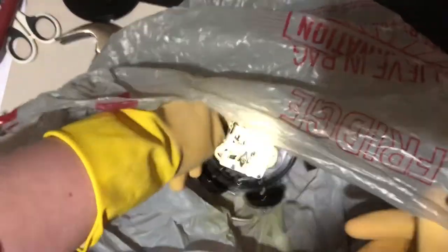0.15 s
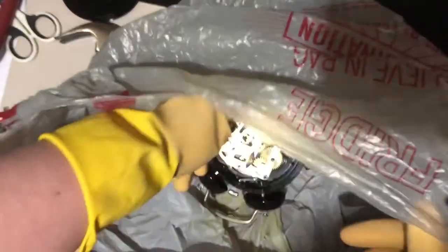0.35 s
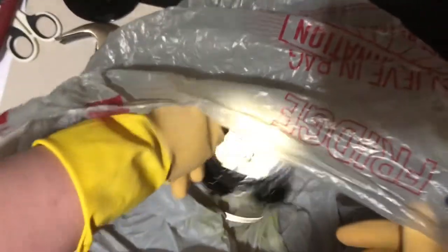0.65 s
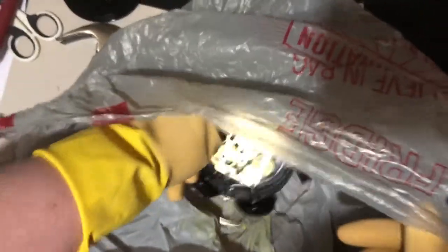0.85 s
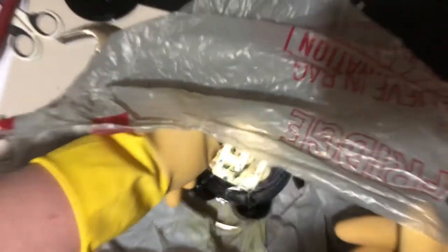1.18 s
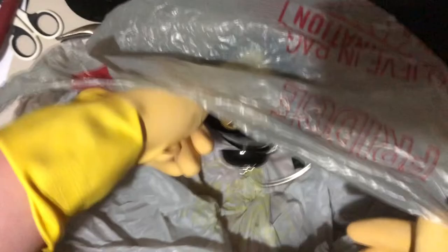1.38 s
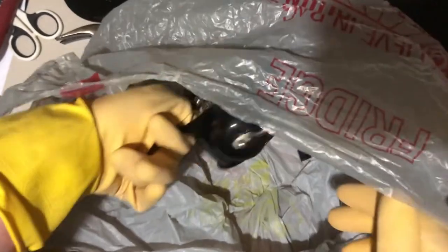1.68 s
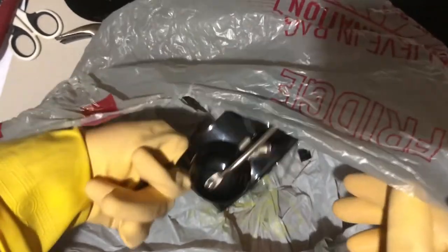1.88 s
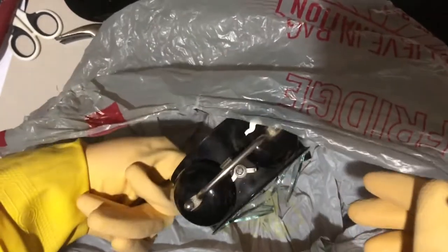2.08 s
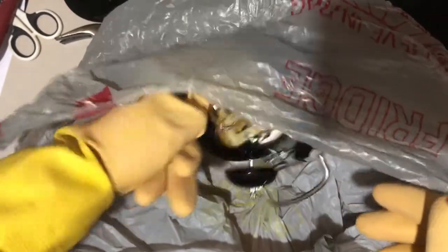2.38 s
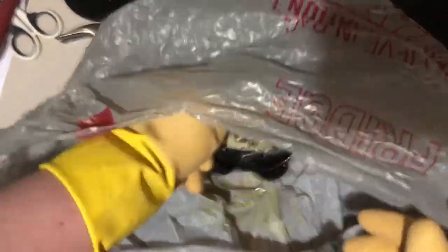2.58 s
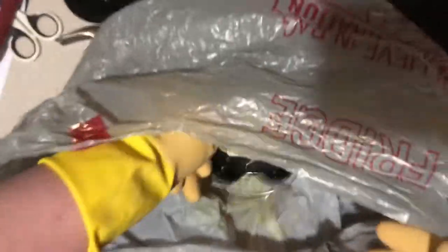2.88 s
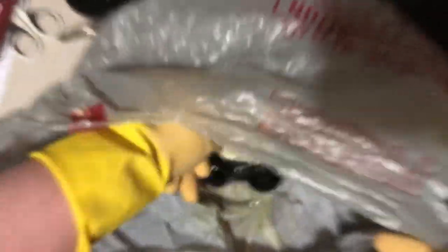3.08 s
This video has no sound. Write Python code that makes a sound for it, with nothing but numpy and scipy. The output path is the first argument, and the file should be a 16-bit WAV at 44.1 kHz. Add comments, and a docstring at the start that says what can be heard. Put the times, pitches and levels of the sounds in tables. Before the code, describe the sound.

Broken glass rattles inside a clock shaken in a crinkling plastic bag, close by in a small room. Until 1.2 seconds, hollow knocks come about six a second, with table thuds and clattering crumbs. The rustle fades almost to silence by 1.7 seconds. From 2.3 seconds the crinkling returns with bright glass clinks, and two heavier knocks land near 2.6 and 2.9 seconds, followed by a few small clinks.

```python
"""On a table in a small room, a gloved hand knocks a broken clock about inside a plastic bag.
It shakes six times a second, rests, then knocks twice more. Each blow rings the clock's case,
thuds on the table and throws glass crumbs about; loose shards click and clink.
The bag crinkles close to the microphone, sinking almost to silence during the rest."""
import sys
import numpy as np
from scipy import signal
from scipy.fft import rfft, irfft
from scipy.io import wavfile
from scipy.ndimage import uniform_filter1d

SR = 44100
rng = np.random.default_rng(int(sys.argv[2]) if len(sys.argv) > 2 else 0)


def bounce(signal):
    """Save signal as a 16-bit WAV file at the path given by the first command-line argument."""
    frames = np.transpose(np.atleast_2d(signal))
    limited = np.clip(frames, -1, 1)
    pcm = np.round(limited * 32767).astype(np.int16)
    wavfile.write(sys.argv[1], SR, pcm)


N = 143325
T = np.arange(N) / SR

# how strongly the bag rustles as it moves: t/s, level/dB
RUSTLE_LEVELS = [(0, -39.5), (.4, -48.5), (.75, -43.5), (1.22, -40.5), (1.42, -48.5), (1.56, -50),
                 (1.72, -59), (2.03, -58.5), (2.228, -65), (2.298, -42), (2.9, -43), (3.25, -42)]
# blows of the clock: t/s, case knock/dB, table thud/dB, crumb clatter/dB
CLOCK_BLOWS = [(.007, -26, -43, -38.5), (0.134, -18.5, -25, -21), (0.198, -32.5, -37, -60),
               (.256, -31, -57, -36), (0.312, -31, -66, -28.5), (0.3397, -25.5, -50, -25),
               (.489, -18.5, -24.5, -25), (.653, -16, -24.5, -22), (.812, -17, -24, -24.5),
               (.821, -23.5, -26, -25), (.979, -13, -17, -21), (1.152, -16.5, -23.5, -22.5),
               (2.425, -31, -29, -33), (2.58, -14, -16.5, -24), (2.781, -32, -62, -59),
               (2.883, -23, -54, -28), (2.893, -19, -16.5, -19), (2.942, -23, -51, -27.5)]


def amp(db):
    """Turn decibels into a factor to multiply by."""
    return 10 ** (np.asarray(db) / 20)


def unit(x):
    """Scale a signal to an average power of 1."""
    return x / np.sqrt(np.mean(x ** 2))


def add(out, start_s, x):
    """Mix x into out from the given second."""
    i = int(round(start_s * SR))
    out[i:i + len(x)] += x[:N - i]


def colour(x, points):
    """Shape the tone of x along a curve (f/Hz, level/dB); white noise keeps its power."""
    hz, db = np.array(points, float).T
    size = 4096
    gain = amp(np.interp(np.log(np.arange(size // 2 + 1) * SR / size + 1), np.log(hz), db))
    # build the filter so that nothing sounds ahead of a hit
    cepstrum = irfft(np.log(unit(gain)))
    cepstrum[1:size // 2] *= 2
    cepstrum[size // 2 + 1:] = 0
    return signal.fftconvolve(x, irfft(np.exp(rfft(cepstrum))))[:len(x)]


def ring(notes, size=22050):
    """A struck thing's fading notes: f/Hz, level/dB, ring time/s (the time to fall by 60 dB)."""
    t = T[:size]
    return sum(amp(db) * np.sin(2 * np.pi * hz * t) * np.exp(-np.log(1000) * t / ring_s)
               for hz, db, ring_s in notes)


def burst(decay_s, size=8820):
    """A level that starts at full strength and dies away."""
    return np.exp(-T[:size] / decay_s)


def wander(rate_hz):
    """A value that glides to a new random level rate_hz times a second."""
    hold = int(SR / rate_hz)
    return uniform_filter1d(np.repeat(rng.standard_normal(N // hold + 1), hold), hold // 2)[:N]


def grains(per_second, spread_db, decay_s=0.00045):
    """A crowd of tiny impacts, each a short fizz; spread_db makes their sizes unequal."""
    hits = rng.random(N) < per_second / SR
    sizes = amp(spread_db * np.minimum(rng.exponential(size=N), 5))
    power = signal.lfilter([1], [1, -np.exp(-2 / (decay_s * SR))], hits * sizes ** 2)
    return unit(np.sqrt(power) * rng.standard_normal(N))


def bag():
    """Thin plastic crinkles in fits, with duller snaps from its larger folds."""
    # tone of the fine crinkles: f/Hz, level/dB
    crinkle_tone = [(1000, -13.5), (2500, 2), (4000, 3.5), (7000, -2), (12000, -1.5), (16000, -6)]
    # tone of the large folds: f/Hz, level/dB
    fold_tone = [(60, -19), (200, 1.5), (400, 3.5), (900, 3.5), (1700, 6.5), (2400, -9.5), (4000, -15),
                 (16000, -41)]
    times, levels = np.array(RUSTLE_LEVELS).T
    fits_db, creases_db = 2.5 * wander(rate_hz=70), 2 * wander(rate_hz=90)
    crinkles = amp(-1) * colour(grains(per_second=2500, spread_db=0.9), crinkle_tone)
    folds = amp(-6.5 + creases_db) * colour(grains(per_second=700, spread_db=0), fold_tone)
    return (crinkles + folds) * amp(np.interp(T, times, levels) + fits_db)


def chips(per_second=130, low_hz=1260, high_hz=11000, ring_s=0.011):
    """Chips of glass tick at random as the bag moves, each on its own pair of notes."""
    out = np.zeros(N)
    times, levels = np.array(RUSTLE_LEVELS).T
    for when, pitch, force, gap in rng.random((int(per_second * N / SR), 4)):
        start = when * N / SR
        hz = low_hz * (high_hz / low_hz) ** np.sqrt(pitch)
        db = np.interp(start, times, levels) - 0.5 + 7 * force
        add(out, start, ring([(hz, db, ring_s), (hz / (1 + gap / 2), db, ring_s / 2)], size=2205))
    return out


def clock(ring_s=0.041, taps_per_second=53):
    """Blows crack on the case and ring it; it chatters against the glass, and loose parts tap it."""
    # notes of the clock's case: f/Hz, level/dB
    case_notes = [(440, -8), (549, -17.5), (764, -6), (880, -5), (1050, -18.5), (1250, -60), (1490, -3),
                  (1610, -5), (1760, -1.5), (1880, -25), (2140, -5.5)]
    # tone of the crack of a blow: f/Hz, level/dB
    crack_tone = [(100, -28), (650, 7.5), (1900, 3), (2600, -8), (16000, -50)]
    push, crack_level = np.zeros(N), np.zeros(N)
    for start, db, _, _ in CLOCK_BLOWS:
        chatter = burst(decay_s=0.014) * rng.standard_normal(8820)
        add(push, start, amp(db - 4.5) * chatter / np.linalg.norm(chatter))
        add(push, start, amp([db]))  # the blow itself, one sample long
        add(crack_level, start, amp(db) * burst(decay_s=0.0081))
    taps = (rng.random(N) < taps_per_second / SR) * rng.uniform(-0.54, 1, N)
    times, levels = np.array(RUSTLE_LEVELS).T
    push += taps * amp(np.interp(T, times, levels) + 10)  # the taps follow the bag's movement
    case = ring([(hz, db, ring_s) for hz, db in case_notes])
    knocks = amp(-8) * signal.fftconvolve(push, case)[:N]
    knocks = signal.sosfilt(signal.butter(2, 400, "high", fs=SR, output="sos"), knocks)
    cracks = amp(-8.5) * colour(crack_level * rng.standard_normal(N), crack_tone)
    return knocks + cracks


def table(sway_hz=75.75, sway_ring_s=1.84, throb_hz=4.7, no_lag_hz=1510):
    """Blows send bending waves through the table top; at times it booms and its low sway swells."""
    # tone of a thud: f/Hz, level/dB
    thud_tone = [(20, -10), (42, -11.5), (130, 10.5), (300, 1), (600, 7), (1500, -18.5), (5000, -67)]
    # notes of the table: f/Hz, level/dB, ring time/s
    table_notes = [(141.5, -28, 0.31), (183, -17.5, 0.21), (277.3, -0.5, 0.046)]
    # booms and swells of the low sway (the last is a swell without a blow): t/s, boom/dB, sway/dB
    booms_and_swells = [(.1335, -15, -62), (0.814, -24.5, -58), (2.575, -18.5, -42), (2.89, -8, -44),
                        (3.165, -38, -45)]
    push = np.zeros(N)
    for start, _, db, _ in CLOCK_BLOWS:
        add(push, start, amp([db + 13]))
    out = colour(push, thud_tone)
    boom = ring(table_notes) * (1 - burst(0.0015, size=22050))  # softened start
    throb = 1 - 0.54 * np.cos(2 * np.pi * throb_hz * T) + 0.64 * wander(rate_hz=39.8)
    for start, boom_db, sway_db in booms_and_swells:
        add(out, start, amp(boom_db) * boom)
        add(out, start, ring([(sway_hz, sway_db, sway_ring_s)], size=N) * throb)
    # low bending waves travel more slowly, so the low notes arrive last
    hz = np.arange(N + 1) * SR / (2 * N)
    lag_s = 0.1626 * (np.clip(hz, 10, no_lag_hz) ** -0.5 - no_lag_hz ** -0.5)
    phase = 2 * np.pi * np.cumsum(lag_s) * hz[1]
    return irfft(rfft(out, 2 * N) * np.exp(-1j * phase))[:N]


def crumbs(rise_s=0.0028, clatter_s=0.014):
    """Glass crumbs are thrown up by each blow and slide over the plastic between blows."""
    # slides of the crumbs: t/s, decay/s, level/dB
    slides = [(.476, 0.017, -25), (.643, .012, -29), (.712, 0.018, -32), (.988, 0.0086, -25.5),
              (2.568, 0.021, -28.5), (2.715, 0.0095, -30.5), (2.84, 0.0088, -23), (3.058, 0.014, -31)]
    # tone of the crumbs: f/Hz, level/dB
    crumb_tone = [(200, -3), (700, -7.5), (1700, 6.5), (2600, -1), (5000, 2), (11000, 1), (16000, -3)]
    throws = [(peak_s, clatter_s, db) for peak_s, _, _, db in CLOCK_BLOWS]
    power = np.zeros(N)
    for peak_s, decay_s, db in throws + list(slides):
        power += amp(db) ** 2 * np.exp(-2 * np.maximum((T - peak_s) / decay_s, (peak_s - T) / rise_s))
    return colour(np.sqrt(power) * grains(per_second=2500, spread_db=1), crumb_tone)


def shards(click_width_octaves=1.9, clink_rise_s=0.00044):
    """Trapped shards click; free ones buzz and ring, brighter or duller with where they are hit."""
    # clicks of glass on glass: t/s, level/dB, centre f/Hz
    clicks = [(.135, -12.5, 9600), (0.314, -22, 11000), (.361, -24, 10000), (0.426, -29, 8060),
              (0.547, -33.5, 5940), (0.6324, -14, 5450), (0.661, -24.5, 8000), (.801, -16.5, 10100),
              (.8235, -18.5, 11000), (0.98, -11.5, 8900), (1.032, -26.5, 11200), (1.8161, -33.5, 3680),
              (1.8407, -35, 8000), (1.8582, -32.5, 5000), (2.273, -29, 8900), (2.325, -27, 12000),
              (2.334, -15, 11700), (2.4666, -17, 11000), (2.532, -19.5, 13000), (2.537, -13.5, 13300),
              (2.731, -25.5, 6450), (2.7805, -12.5, 7500), (2.828, -31, 9000), (2.861, -26, 6000),
              (2.903, -15.5, 14000), (2.935, -14.5, 10100), (2.942, -15, 8000), (2.9915, -24, 10000),
              (3.002, -16.5, 11000)]
    # notes of four loose shards, by name: f/Hz, level/dB, ring time/s
    shard_notes = {"long": [(5320, -4, .26), (7580, -7, .13), (12655, -5, .13), (14765, -3, .12)],
                   "bright": [(5230, -6, .07), (11440, 0, .062), (12630, -9, .04), (14070, -10, .065)],
                   "pure": [(7168, -1, .095)], "thin": [(4619, -12, .06), (9970, 0, .085),
                   (15700, -9, .08)]}
    # clinks: t/s, brightness/(dB per octave), {name of struck shard: level/dB}
    clinks = [(2.281, -9, {"long": -39, "thin": -35.5}), (2.332, 6, {"long": -23.5, "bright": -32}),
              (2.446, -11.5, {"long": -29.5}), (2.4496, 9, {"bright": -18}),
              (2.4604, -2, {"bright": -11.5, "pure": -15.5}),
              (2.4902, 2.5, {"long": -24.5, "bright": -12, "pure": -18, "thin": -19}),
              (2.894, -7, {"long": -32, "pure": -31}), (3.004, 3, {"long": -32, "pure": -21, "thin": -24}),
              (3.101, -11, {"bright": -39, "pure": -39})]
    # splinters that ping on one note: t/s, f/Hz, level/dB, ring time/s
    pings = [(.822, 14900, -20, .025), (0.858, 12400, -27, 0.025), (.938, 14500, -31, .06),
             (2.938, 12260, -19, 0.11), (2.94, 15600, -23, 0.069)]
    out = np.zeros(N)
    bands_hz = np.geomspace(200, 20000, 16)
    for start, db, centre_hz in clicks:
        bands_db = -10 * np.log10(1 + 2 * (np.log2(bands_hz / centre_hz) / click_width_octaves) ** 2)
        decay_s = 0.0037 * amp(0.13 * db)  # harder contacts grind for longer
        grind = burst(decay_s) * rng.standard_normal(8820)
        add(out, start, amp(db) * colour(grind, np.c_[bands_hz, bands_db]))
    for start, brightness, struck in clinks:
        for name, db in struck.items():
            tone = ring([(hz, db + note_db + brightness * np.log2(hz / 9000), ring_s)
                         for hz, note_db, ring_s in shard_notes[name]])
            tone *= 1 - burst(clink_rise_s, size=len(tone))
            # the shard buzzes against its neighbours just after the hit
            flutter = unit(uniform_filter1d(rng.standard_normal(len(tone)), size=40))
            buzz = amp(-6.5) * flutter * burst(decay_s=0.022, size=len(tone))
            add(out, start, tone * (1 + buzz))
    for start, hz, db, ring_s in pings:
        add(out, start, ring([(hz, db, ring_s)]))
    return out


def pock(start_s=2.5728, hz=866, rise_s=0.0027):
    """The case meets the table with one hollow knock that swells for a few cycles and stops short."""
    out, t = np.zeros(N), T[:SR // 20]
    swell = (t / rise_s * np.exp(1 - t / rise_s)) ** 4
    add(out, start_s, amp(-9) * swell * np.sin(2 * np.pi * hz * t))
    return out


def air():
    """The faint, low background noise of the quiet room."""
    # tone of the background: f/Hz, level/dB
    air_tone = [(25, 3), (70, 1.5), (300, -3), (1000, -15), (16000, -34)]
    return amp(-62) * colour(rng.standard_normal(N), air_tone)


def room(x, ring_s=0.29, rise_s=0.0039, dull_above_hz=5930):
    """The walls add a short, dull wash of echoes."""
    tail = rng.standard_normal(N) * np.exp(-np.log(1000) * T / ring_s) * (1 - np.exp(-T / rise_s))
    tail = signal.lfilter([1], [1, -np.exp(-2 * np.pi * dull_above_hz / SR)], tail)
    return x + amp(-15) * signal.fftconvolve(x, tail / np.linalg.norm(tail))[:N]


def scene():
    """Clock, table, glass and bag echo in the room; the pock and the background have no echo."""
    background = air()
    shaking = clock() + table() + crumbs() + shards() + bag() + chips()
    return (room(shaking) + pock() + background)[None]


def record(dry, low_hz=34, top_hz=16000):
    """The recorder cuts the deep bass and the highest treble."""
    thin = signal.sosfilt(signal.butter(4, low_hz, "high", fs=SR, output="sos"), dry)
    return signal.sosfilt(signal.ellip(8, 0.2, 70, top_hz, fs=SR, output="sos"), thin)


dry = scene()
out = record(dry)
bounce(out)
```